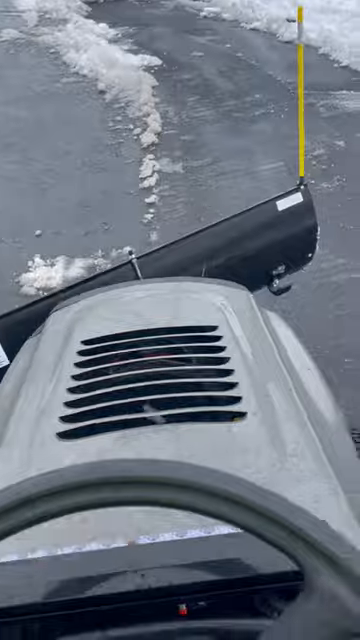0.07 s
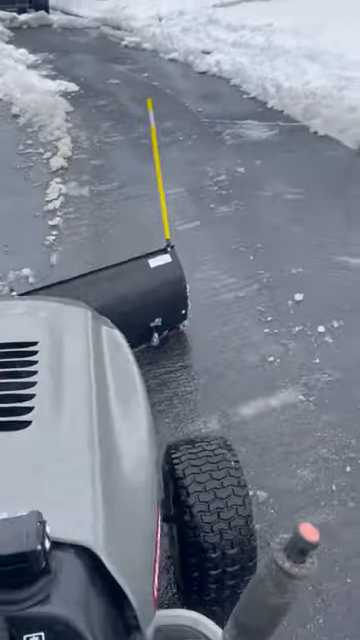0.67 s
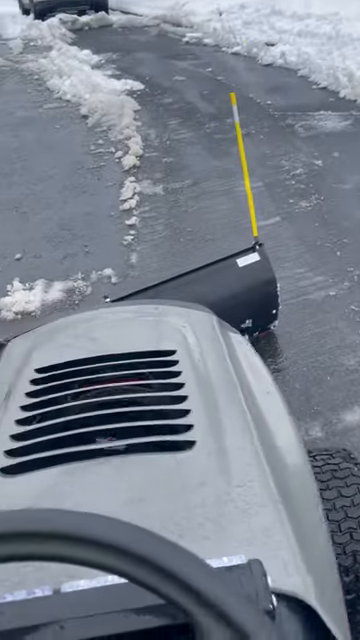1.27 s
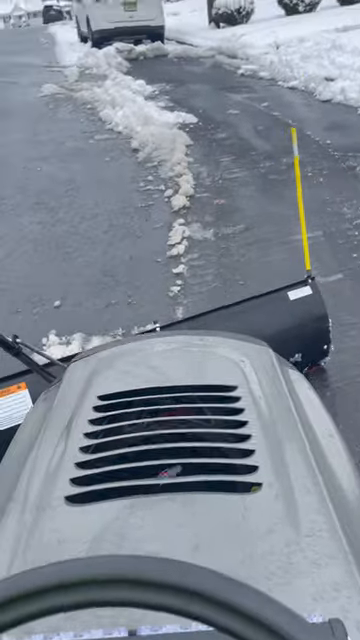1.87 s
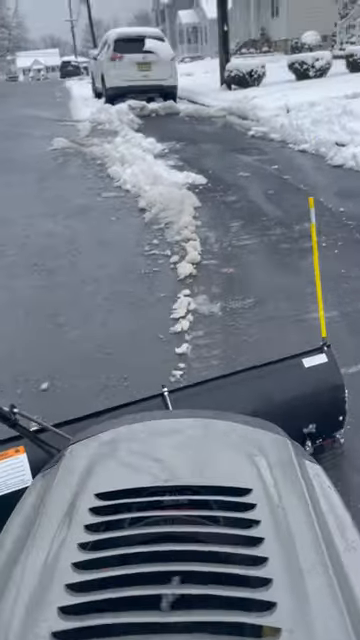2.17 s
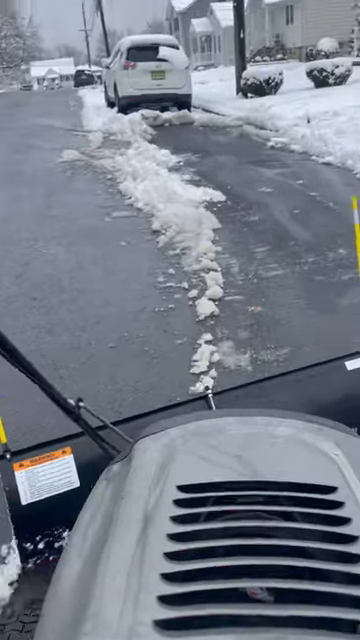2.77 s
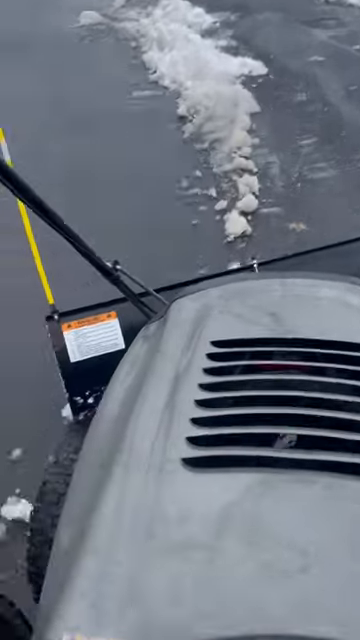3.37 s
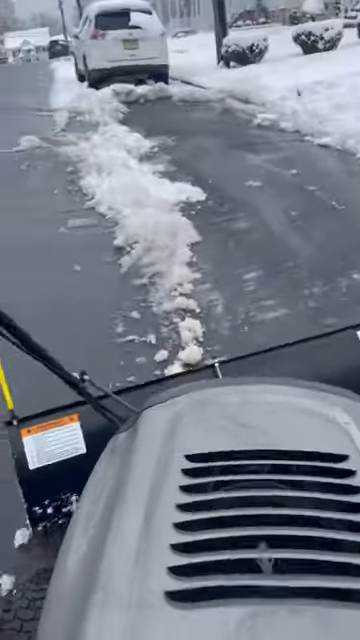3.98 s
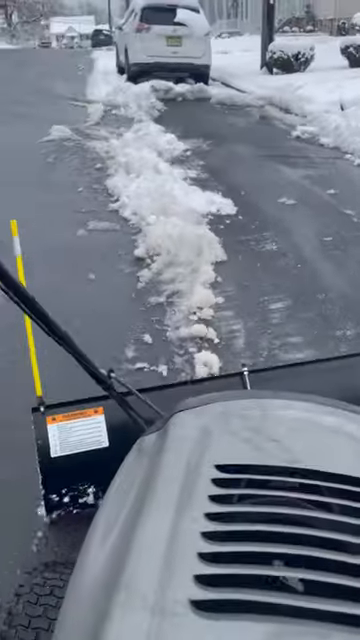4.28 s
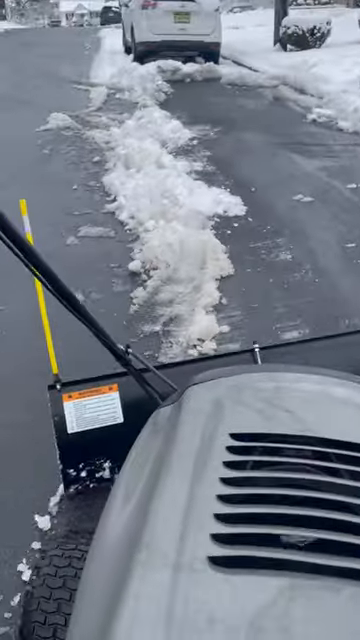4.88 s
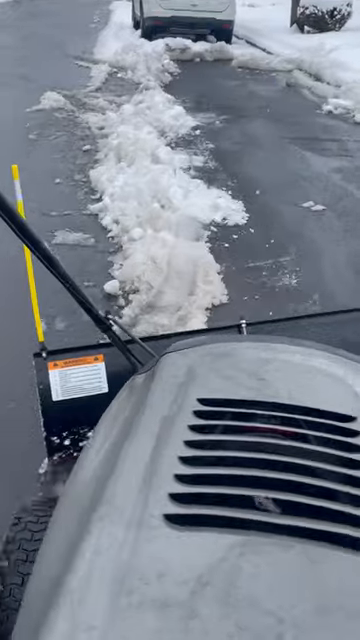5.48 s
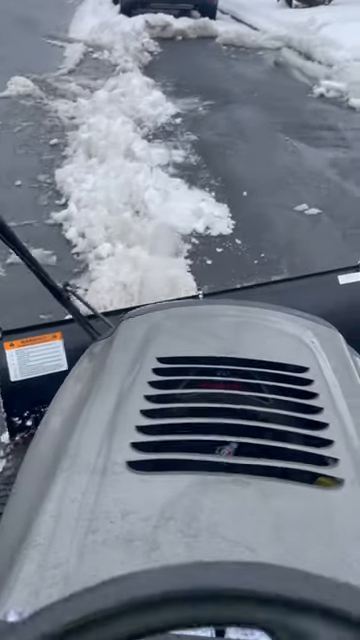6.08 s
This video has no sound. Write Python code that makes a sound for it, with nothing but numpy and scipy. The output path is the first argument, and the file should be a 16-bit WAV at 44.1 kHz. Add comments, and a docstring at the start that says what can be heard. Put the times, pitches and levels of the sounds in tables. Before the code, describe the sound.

A one-cylinder lawn tractor drones loudly for the whole six seconds or so, heard close from the seat, outdoors. Its exhaust thuds in a fast, even, low throb, with knocking and clattering parts, pulsing valve hiss and the whine and rush of the cooling fan. The speed stays nearly steady, sagging slightly around 1.5 seconds. Under the engine, a steel plow blade drags lightly on wet asphalt. From about 1.6 to 2.6 seconds it bites harder, with gritty scraping, short rattles and dull ringing knocks. A brief catch comes near 3.7 seconds, and more follow between 4.2 and 4.8. From about 5.1 seconds to the end the catches come thicker, shaking the steel. A soft fizz of water and slush runs underneath, growing slightly after 1.8 seconds. The engine is still running at the end.

```python
"""On a wet, slushy road, a one-cylinder lawn tractor pushes a steel plow blade, heard from the seat.
The exhaust thuds once every two turns of the engine, over air gulps, knocking parts, hissing valves
and the whine and rush of the cooling fan. The blade drags lightly and now and then bites the asphalt:
its steel shakes and rings, grit is crushed under its edge, and slush fizzes beneath it."""
import sys
import numpy as np
from scipy import signal
from scipy.fft import rfft, irfft, next_fast_len
from scipy.io import wavfile
from scipy.ndimage import uniform_filter1d

SR = 44100
rng = np.random.default_rng(int(sys.argv[2]) if len(sys.argv) > 2 else 0)


def inscribe(sig):
    """Save sig as 16-bit PCM at rate SR to the path in sys.argv[1].

    A 1-D sig is mono; a 2-D sig holds one channel per row.
    Samples are clipped to [-1, 1] before scaling.
    """
    pcm = np.round(np.clip(np.atleast_2d(sig).T, -1, 1) * 32767)
    wavfile.write(sys.argv[1], SR, pcm.astype(np.int16))


N = 274743
TIME = np.arange(N) / SR
FFT_SIZE = next_fast_len(N + 16384)
FFT_HZ = np.fft.rfftfreq(FFT_SIZE, 1 / SR)

# the blade catches on the asphalt: (time [s], rattle level [dB], rattle fade [s], thud level [dB])
CATCHES = [(1.6511, -13, 0.032, -13), (1.7605, -7, 0.0057, -18), (1.796, -13, 0.0088, -26),
           (2.011, -11.5, 0.01, -25), (2.169, -10.5, 0.0095, -30), (2.4666, -17, 0.014, -17),
           (2.495, -12.5, 0.017, -15), (3.668, -17.5, 0.015, -29), (4.272, -11, .008, -32),
           (4.525, -17, 0.024, -18), (4.7448, -14, 0.018, -14), (5.0927, -12.5, .012, -31),
           (5.36, -11.5, 0.019, -28), (5.3977, -13, 0.0073, -15), (5.498, -19, 0.0079, -16),
           (5.612, -13, .006, -15), (5.752, -13.5, 0.018, -37), (5.847, -19, .008, -17),
           (5.8764, -11, 0.018, -14), (5.9128, -9.5, 0.0088, -14.5), (6.04, -8.5, .008, -14),
           (6.1793, -9, 0.0092, -39), (6.213, -13.5, 0.012, -19)]


def exhaust(cycle, lean, gain_db, bark_db):
    """Each firing sends a thud through the muffler; its bark is less shielded beside the hood."""
    start_hz, end_hz, fall_s = 260, 81.7, 0.0062
    rise_s, fade_s = 0.0025, 0.014
    t = TIME[TIME < .12]
    hz = end_hz + (start_hz - end_hz) * np.exp(-t / fall_s)  # pitch falls as the pressure is spent
    loudness = (1 - np.exp(-(t / rise_s) ** 2)) * np.exp(-t / fade_s)
    thud = loudness * np.sin(2 * np.pi * np.cumsum(hz) / SR)
    firings = each_cycle(cycle, 0.96, spread_db=0.35, jitter_s=.00006)
    thuds = signal.fftconvolve(firings, thud)[:N]
    bark = signal.sosfilt(signal.butter(1, [205, 290], "band", fs=SR, output="sos"), thuds)
    return from_db(gain_db) * (thuds + lean * from_db(bark_db) * bark)


def intake(cycle, gain_db, airbox_hz, ring_s):
    """Half a cycle after the exhaust the piston gulps air, and the air filter box booms."""
    gulps = each_cycle(cycle, 0.4405, spread_db=1.3, jitter_s=.00006)
    return from_db(gain_db) * ring(gulps, airbox_hz, ring_s)


def knocks(cycle, gain_db):
    """The piston and valve parts strike the engine block at the same points in every cycle."""
    # knocks: (place in the cycle [0-1], pitch [Hz], relative level [dB], ring time [s])
    strikes = [(.08, 1023, -16, 0.018), (0.129, 475, -20, 0.013), (.575, 1010, -14, 0.011),
               (.675, 1114, -23.5, 0.038), (0.651, 1510, -24, 0.018), (0.798, 1587, -24, 0.023),
               (.87, 1490, -23, 0.013), (.89, 484, -25, 0.033), (0.969, 1420, -17, 0.0034)]
    out = np.zeros(N)
    for place, hz, db, ring_s in strikes:
        clicks = each_cycle(cycle, place, spread_db=4.5, jitter_s=.00007)
        out += from_db(db) * ring(clicks, hz, ring_s)
    return from_db(gain_db) * out


def whine(cycle, lean, waver_db, wobble_rad, skew_rad):
    """Fan and gears sing in step with the engine; which tones stand out depends on where the head is."""
    # tones: (pitch [times the firing rate, rounded below], level over the hood [dB], to its right [dB])
    tones = [(12, -34.5, -30.5), (15.97, -41.5, -43.5), (18.1, -43.5, -46.5), (19.95, -45, -46),
             (21, -49, -44), (23.94, -35.5, -49), (24.92, -40, -44.5), (27.96, -40.5, -34.5),
             (30.11, -36.5, -48.5), (31.8, -42, -37.5), (35.63, -49, -39.5), (38.07, -37.5, -38),
             (40.03, -40, -43), (42.13, -33.5, -38), (44, -40.5, -42), (47.9, -36, -39),
             (53.06, -52, -41.5), (54, -41, -42), (62.92, -36.5, -40), (63.9, -40.5, -35),
             (66.02, -38, -38.5)]
    out = np.zeros((2, N))
    for multiple, over_db, beside_db in tones:
        angle = 2 * np.pi * (round(multiple) * cycle + rng.random()) + wobble_rad * drift(25)
        level_db = over_db + lean * (beside_db - over_db) + waver_db * drift(4.01)
        side_shift = skew_rad * drift(1.4) * [[1], [-1]]
        out += np.sqrt(2) * from_db(level_db) * np.sin(angle + side_shift)
    return out


def fan(cycle, gain_db, throb_db, flutter_db):
    """Cooling air rushes through the hood vents, throbbing with the firings."""
    # tone of the rushing air: (frequency [Hz], relative level [dB])
    spectrum = [(32, -29), (70, -12.5), (225, 7), (330, -6), (700, 3), (880, -3), (1100, 4.5), (1350, 0.5),
                (1560, 2.5), (1800, -3.5), (2500, -9), (4000, -11.5), (8000, -44), (15000, -31)]
    swell_db = throb_db * np.cos(2 * np.pi * (cycle - .03))
    rush = stereo_noise() * from_db(swell_db + flutter_db * drift(200))
    return from_db(gain_db) * colour(rush, spectrum)


def clatter(cycle, gain_db, waver_db, surge_db):
    """Countless small parts tap, hardest around the firing: some repeat each cycle, loose ones never."""
    # tone of the tapping parts: (frequency [Hz], relative level [dB])
    spectrum = [(200, -29), (400, -1.5), (900, 0.5), (1300, -9.5), (1600, 1), (1800, -4.5), (2300, -5),
                (3500, -13.5), (8000, -38.5)]
    patterns = rng.standard_normal((2, 1800))
    repeating = [np.interp(cycle % 1, np.linspace(0, 1, len(p)), p) for p in patterns]
    loose = rng.standard_normal((2, N))
    swell_db = surge_db * np.cos(2 * np.pi * (cycle - .92))
    taps = to_stereo(repeating + loose) * from_db(swell_db + waver_db * drift(150))
    return from_db(gain_db) * colour(taps, spectrum)


def blade_force():
    """The shaking and grinding forces on the edge, in dB: a light drag plus bites, on an uneven road."""
    # drag of the blade on the road: (time [s], shaking [dB], grinding [dB])
    drag = [(0, -14, -10.5), (1.2, -12.5, -9), (1.6, -5.5, -6.5), (2.5, -8, -6), (2.65, -7.5, -5.5),
            (3.0, -7.5, -10), (3.35, -7, -7.5), (4.35, -10.5, -6.5), (4.85, -8, -6), (6.2, -6, -8)]
    # the edge digs into high spots: (start [s], length [s], shaking [dB], grinding [dB])
    bites = [(1.603, 0.2, -3, -5), (1.824, 0.47, -5.5, -8), (2.404, 0.16, -7, -2.5),
             (3.503, .07, -19, -4.5), (3.63, 0.04, -8, -1), (4.206, 0.053, -5, -3.5),
             (4.515, 0.26, -6, -6.5), (5.067, 0.095, -5, -13), (5.337, 0.084, -7.5, -5),
             (5.47, 0.41, -6.5, -6), (5.825, 0.045, -4.5, -1.5)]
    build_s, let_go_s = 0.0067, 0.041
    power = from_db(over_time(drag)) ** 2
    for start, length, *force_db in bites:
        build = np.clip((TIME - start) / build_s, 0, 1)
        let_go = np.exp(-np.maximum(TIME - start - length, 0) / let_go_s)
        power += np.outer(from_db(force_db), build * let_go) ** 2
    bumps_db = np.outer((-1, 0.5), drift(per_s=14))  # shaking dips as grinding rises
    return 10 * np.log10(power) + bumps_db


def blade(force_db, gain_db, width):
    """The edge sticks and slips on the asphalt; slips and hard catches make the steel ring."""
    # notes of the steel blade: (pitch [Hz], relative level [dB], ring time [s])
    notes = [(91, -5, 0.11), (130, -5.5, 0.076), (176, 2, 0.069), (202.6, 1.7, 0.072), (252, 0, 0.034),
             (401, -1.5, 0.036), (457, -1.5, 0.047), (564, -2, 0.041), (762, -3.5, 0.026),
             (970, -18, 0.014), (1292, -5, 0.024), (2013, -5, 0.023)]
    lowest_hz = notes[0][0]
    slips = unit_power(random_clicks(1400, spread_db=0.5)) * from_db(gain_db + 0.98 * force_db)
    jolts = np.zeros(N)
    for start, _, _, thud_db in CATCHES:
        jolts[round(start * SR)] = from_db(thud_db)
    out = np.zeros((2, N))
    for hz, db, ring_s in notes:
        force = slips * rng.standard_normal(N) + jolts * rng.uniform(0.46, 0.92, N)
        pan = width * np.sqrt(hz / lowest_hz) * rng.standard_normal(N)  # hits land all along the edge
        out += from_db(db) * ring(force * (1 + pan * [[1], [-1]]), hz, ring_s)
    # an open plate gives off no deep bass
    return signal.sosfilt(signal.butter(4, 70, "high", fs=SR, output="sos"), out)


def grinding(force_db, crush_db, rattle_db, chatter_db):
    """Grit is crushed under the edge in short bursts; each catch sets off a loose, dying rattle."""
    # tone of the crushed grit: (frequency [Hz], relative level [dB])
    spectrum = [(300, -11.5), (900, -4.5), (1500, -7), (2050, 4), (2500, -0.5), (3100, -0.5), (4200, -6.5),
                (6500, -6.5), (12000, -59)]
    burst_s, smooth_scrape = 0.0088, .5
    cracks = random_clicks(220, spread_db=0.5)
    bursts = unit_power(signal.lfilter([1], [1, -np.exp(-1 / (burst_s * SR))], cracks))
    crushing = from_db(crush_db + 0.91 * force_db) * unit_power(smooth_scrape + bursts)
    rattle = sum(from_db(db + rattle_db) * (TIME >= start) * np.exp(-np.abs(TIME - start) / fade_s)
                 for start, db, fade_s, _ in CATCHES)
    scrape = colour(stereo_noise(), spectrum)
    return scrape * np.hypot(crushing, rattle * from_db(chatter_db * drift(260)))


def slush(force_db, wet_db, slushy_db, spatter_db):
    """Water and wet snow fizz under blade and tyres, more in the slush and when the edge presses."""
    # tone of the fizz: (frequency [Hz], relative level [dB])
    spectrum = [(2500, -29.5), (4400, -7), (5000, 6.5), (5500, 5), (6400, 1.5), (8000, -4), (11000, -5),
                (13200, -14), (15000, -12)]
    depth = .5 + .5 * np.tanh((TIME - 1.8) / 0.24)  # the wet road turns slushy around 1.8 s
    level_db = wet_db + depth * (slushy_db - wet_db) + 0.12 * force_db
    drops = random_clicks(1500, spread_db=5.5) * from_db(spatter_db)
    fizz = to_stereo(rng.standard_normal((2, N)) * (1 + drops))
    return from_db(level_db) * colour(fizz, spectrum)


def valve_hiss(cycle, gain_db, exhaust_db, intake_db, fade_cycles):
    """Gas hisses past the exhaust valve, then the intake valve, in two puffs a cycle."""
    # tone of the hissing gas: (frequency [Hz], relative level [dB])
    spectrum = [(2000, -20), (4500, 2), (7000, 8), (9500, 10), (11500, 4), (13200, -2), (15000, 1)]
    # the hiss rises and falls as the head moves about: (time [s], relative level [dB])
    levels = [(.2, -7), (1.05, -0.2), (2.5, -1.5), (2.95, -2.5), (3.32, 1.5), (3.56, 0.5), (3.68, -5),
              (4.04, -3), (4.25, -3), (5.25, -7), (5.5, -1.5), (6.2, -3)]
    head_db, = over_time(levels)
    exhaust_puff = from_db(exhaust_db) * np.exp(-((cycle - .14) % 1) / fade_cycles)
    intake_puff = from_db(intake_db) * np.exp(-((cycle - .44) % 1) / fade_cycles)
    flow = uniform_filter1d(1 + exhaust_puff + intake_puff, size=160)
    return from_db(gain_db + head_db) * colour(stereo_noise() * flow, spectrum)


def vent_nearness():
    """Sounds leaving the hood vents swell by this factor as the head passes over them."""
    # passes over the vents: (time [s], half length [s], boost [dB])
    passes = [(1.493, 0.22, 1.5), (3.443, 0.1, 2.5)]
    return from_db(sum(db * np.exp(-((TIME - middle) / half) ** 2) for middle, half, db in passes))


def from_db(db):
    """Turn decibels into a factor to multiply by."""
    return 10 ** (np.asarray(db) / 20)


def unit_power(x):
    """Scale a signal so that its average power is 1."""
    return x / np.sqrt(np.mean(x ** 2) + 1e-20)


def over_time(rows):
    """Join (time, values...) rows with straight lines, giving one curve for each value column."""
    times, *columns = np.transpose(rows)
    return [np.interp(TIME, times, column) for column in columns]


def over_frequency(rows):
    """Join (frequency, value) rows into a curve, giving every octave equal room."""
    hz, value = np.transpose(rows)
    return np.interp(np.log(FFT_HZ + 1), np.log(hz), value)


def drift(per_s):
    """A random wander of typical size 1, with `per_s` new values a second."""
    return unit_power(np.interp(TIME * per_s, np.arange(8192), rng.standard_normal(8192)))


def colour(x, spectrum):
    """Give a sound the tone of `spectrum`, at an average power of 1."""
    cepstrum = irfft(np.log(from_db(over_frequency(spectrum))), FFT_SIZE)
    cepstrum[1:] *= 2 * (np.arange(1, FFT_SIZE) < FFT_SIZE // 2)  # ring after a sound, never before it
    response = np.exp(rfft(cepstrum))
    return unit_power(irfft(rfft(x, FFT_SIZE) * response, FFT_SIZE)[..., :N])


def ring(clicks, hz, ring_s):
    """Each click starts a pure tone that fades by 60 dB in `ring_s` seconds."""
    decay = from_db(-60 / (ring_s * SR))
    step = 2 * np.pi * hz / SR
    return signal.lfilter([0, np.sin(step)], [1, -2 * decay * np.cos(step), decay ** 2], clicks + 1e-18)


def to_stereo(pair):
    """Mix two unrelated signals into left and right, alike in the bass and mostly less so higher up."""
    # how alike the two sides sound: (frequency [Hz], likeness [0-1])
    likeness = [(100, .97), (400, .88), (650, .75), (1200, .9), (1560, .85), (2000, .97), (2500, .62),
                (4000, .66), (4600, .5), (5000, .86), (5400, .92), (6200, .8), (7500, .95), (9300, .76),
                (11000, .9), (12700, .62), (14200, .97)]
    alike = np.clip(over_frequency(likeness), 0, 1)
    shared, apart = rfft(pair, FFT_SIZE)
    sides = np.sqrt(1 + alike) * shared + np.sqrt(1 - alike) * apart * [[1], [-1]]
    return irfft(sides, FFT_SIZE)[:, :N]


def stereo_noise():
    """An even hiss on the left and right."""
    return to_stereo(rng.standard_normal((2, N)))


def each_cycle(cycle, place, spread_db, jitter_s):
    """One click per engine cycle at `place` (0-1), each a little different in strength and timing."""
    on_time = np.flatnonzero(np.diff(np.floor(cycle - place)) > 0)
    strength, slip = rng.standard_normal((256, 2))[:len(on_time)].T
    samples = on_time + np.round(slip * jitter_s * SR).astype(int)
    clicks = np.zeros(N)
    clicks[np.clip(samples, 0, N - 1)] = from_db(spread_db * strength)
    return clicks


def random_clicks(per_s, spread_db):
    """Clicks of uneven size at random moments."""
    return (rng.random(N) < per_s / SR) * from_db(spread_db * np.minimum(rng.exponential(1, N), 4))


def scene():
    """Engine and plow together: the cycle times the engine's sounds, the edge's force drives the plow's."""
    # the nearly steady engine speed under its governor: (time [s], speed [turns per minute])
    speeds = [(0.0, 2881), (0.3, 2920), (0.75, 2947), (1.25, 2901), (1.45, 2810), (1.75, 2827), (2.1, 2889),
              (2.7, 2867), (3.3, 2882), (3.8, 2901), (4.35, 2866), (4.6, 2899), (5.0, 2841), (5.35, 2854),
              (5.6, 2882), (6.23, 2888)]
    # the listener's head: (time [s], lean to the right of the hood [0-1])
    leans = [(0, 1), (.9, 0.87), (1.3, 0.6), (3.0, 0.01), (6.2, 0.2)]
    rpm, = over_time(speeds)
    lean, = over_time(leans)
    cycle = .87 + np.cumsum(rpm / 60 / 2) / SR  # counts engine cycles: one firing in two turns
    thuds = exhaust(cycle, lean, gain_db=-5, bark_db=-5)
    gulps = intake(cycle, gain_db=-6.5, airbox_hz=65, ring_s=0.03)
    hood = whine(cycle, lean, waver_db=1.5, wobble_rad=0.27, skew_rad=0.022)
    hood += knocks(cycle, gain_db=-2)
    hood += clatter(cycle, gain_db=-31.5, waver_db=2, surge_db=0.5)
    hood += fan(cycle, gain_db=-25.5, throb_db=0.6, flutter_db=1)
    valves = valve_hiss(cycle, gain_db=-34.5, exhaust_db=-2, intake_db=10, fade_cycles=0.12)
    engine = thuds + gulps + valves + vent_nearness() * hood
    shake_db, grind_db = blade_force()
    steel = blade(shake_db, gain_db=-43, width=0.0065)
    grit = grinding(grind_db, crush_db=-25, rattle_db=-8, chatter_db=1)
    fizz = slush(grind_db, wet_db=-32, slushy_db=-30, spatter_db=-2.5)
    return engine + steel + grit + fizz


def record(dry):
    """Two microphone openings hear the treble out of step; deep bass, peaks and the very top are cut."""
    # how far the left side runs ahead: (frequency [Hz], lead [radians])
    leads = [(2000, 0), (2800, 1.4), (4200, .9), (4900, -.2), (5500, .5), (7000, 3), (8200, 3.25),
             (10400, 6.2), (12000, 6.5), (13200, 9.3), (16000, 9.5)]
    # how much louder the left side is: (frequency [Hz], left minus right [dB])
    balance = [(50, 0.2), (170, -0.8), (400, -1.1), (660, -2.3), (1050, 0.8), (1900, -0.4), (2500, -1.9),
               (3500, 0.7), (4600, -1), (5000, 0.3), (8000, 0)]
    bass_cut_hz, top_cut_hz, silent_start_s = 36, 15750, .036
    side = np.array([[.5], [-.5]])
    openings = np.exp(1j * side * over_frequency(leads)) * from_db(side * over_frequency(balance))
    bass_cut = 1 / (1 + (bass_cut_hz / (FFT_HZ + 1)) ** 8)
    heard = irfft(rfft(dry, FFT_SIZE) * openings * bass_cut, FFT_SIZE)[:, :N]
    clipped = np.clip(heard, -.92, .92) * (TIME > silent_start_s)
    return signal.sosfilt(signal.ellip(10, .2, 80, top_cut_hz, fs=SR, output="sos"), clipped)


dry = scene()
out = record(dry)
inscribe(out)
```